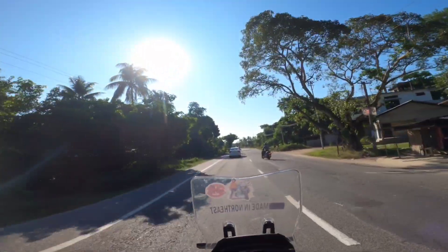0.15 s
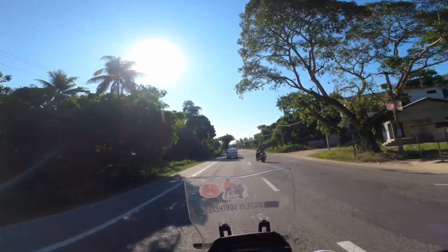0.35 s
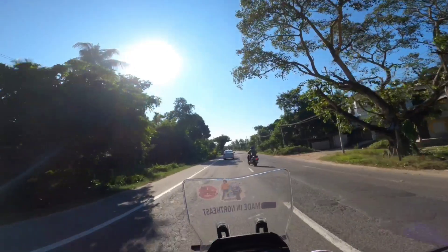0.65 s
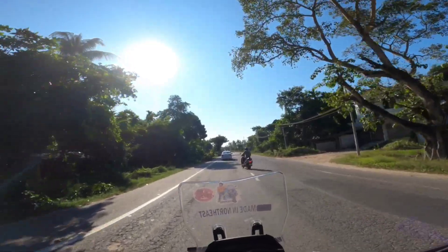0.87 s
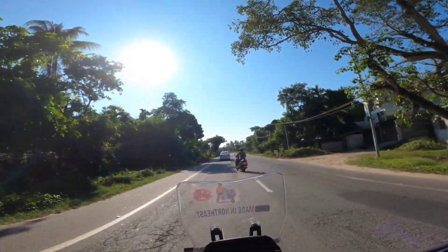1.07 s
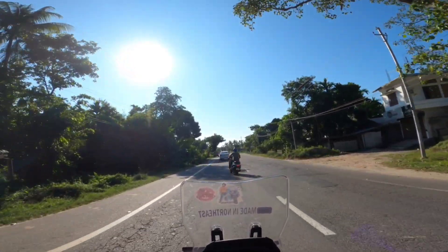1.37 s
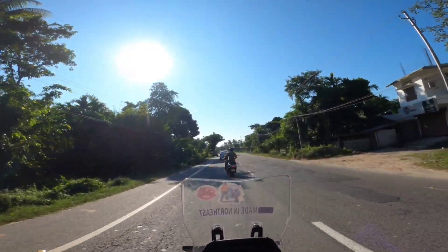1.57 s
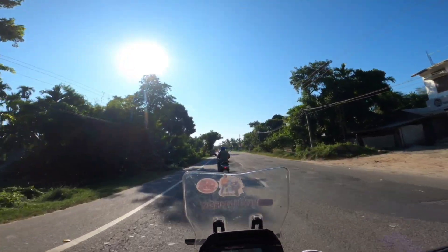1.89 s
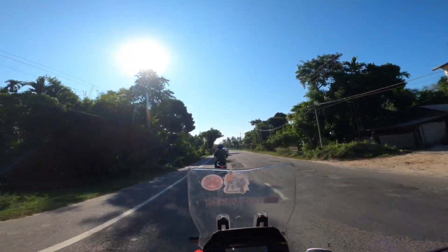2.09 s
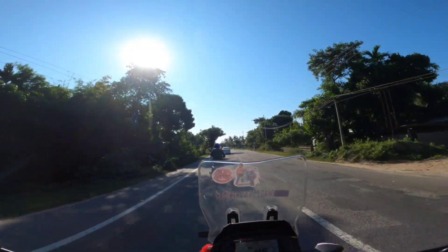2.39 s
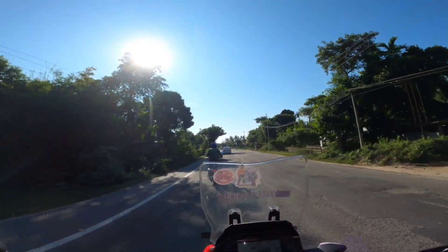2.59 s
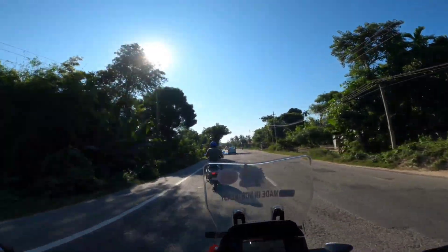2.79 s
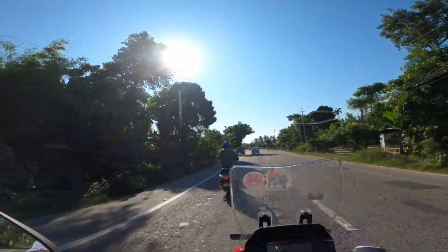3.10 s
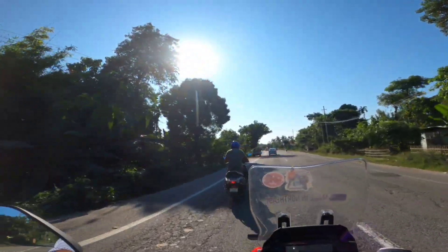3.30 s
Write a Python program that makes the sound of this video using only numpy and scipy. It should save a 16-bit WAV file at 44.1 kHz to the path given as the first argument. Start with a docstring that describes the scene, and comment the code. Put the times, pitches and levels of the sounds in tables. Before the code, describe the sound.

A motorcycle horn starts at about 0.1 seconds and holds one steady, raspy note until 1.9 seconds, with faint, slightly higher echoes from the roadside. Wind rumbles and thumps on the on-board microphone throughout, gusting around 0.7, 0.8 and 3 seconds. A soft engine hum sinks slightly in pitch beneath it. From about 2 seconds a loose fitting ticks faintly, and the wind rush and engine swell from 2.5 seconds.

```python
"""On a tree-lined road, a moving motorcycle sounds its electric disc horn once, for almost two seconds.
An armature strikes once a cycle, giving a harmonic series and a rasp. Trees and walls reflect the horn,
raised in pitch by the Doppler effect. Turbulent wind buffets the on-board microphone, the engine hums
beneath it, and a loose fitting ticks as the ride gets rougher."""
import sys
import numpy as np
from scipy import signal
from scipy.fft import rfft, irfft
from scipy.io import wavfile

SR = 44100
rng = np.random.default_rng(int(sys.argv[2]) if len(sys.argv) > 2 else 0)


def bounce(signal):
    """Save signal as a 16-bit WAV file at the path given by the first command-line argument."""
    frames = np.transpose(np.atleast_2d(signal))
    limited = np.clip(frames, -1, 1)
    pcm = np.round(limited * 32767).astype(np.int16)
    wavfile.write(sys.argv[1], SR, pcm)


N = 152145
T = np.arange(N) / SR
HZ = np.fft.rfftfreq(N, 1 / SR)

# envelope of the wind's hiss, which the faint ticks also follow: time_s, level_db
HISS_LEVEL = [(0, -49), (1.9, -53), (2.25, -54), (2.42, -49), (2.48, -51), (2.7, -50), (3.0, -44.5),
              (3.2, -48.5), (3.45, -47)]


def horn():
    """Periodic impact: an armature striking once a cycle excites harmonics and a pulsed rasp."""
    # fundamental: time_s, pitch_hz
    pitch = [(.085, 445.3), (.25, 444.8), (.55, 444.4), (.66, 443.8), (1.2, 443.55), (1.88, 443.2)]
    # envelope of the tone: time_s, level_db
    level = [(.09, -23), (.35, -26.5), (.65, -23.5), (1.25, -22.5), (1.6, -25), (1.89, -25.5)]
    # harmonic series before shaping: harmonic_number, relative_db
    partials = [(1, 0), (2, -17), (3, -24), (4, -29), (5, -31), (6, -4), (7, -4), (8, -4), (9, -22),
                (10, -18), (11, -17), (12, -35), (13, -34), (14, -31), (15, -28), (16, -39), (17, -33),
                (18, -25), (19, -23), (20, -28), (21, -28), (22, -22), (23, -25), (24, -34), (25, -35),
                (26, -28), (27, -34), (28, -29), (29, -35), (30, -35), (31, -34), (32, -30), (33, -33),
                (34, -29), (35, -38)]
    # boost and cut near 6.4 kHz, brightest late in the blast: time_s, gain_db
    shine = [(0, -2), (.4, 3), (.7, -5.5), (1.35, -8), (1.41, 5), (1.9, 3)]
    # spectrum of the armature's rasp: frequency_hz, relative_db
    rasp_spectrum = [(1800, -26), (2600, -5), (3800, -2), (4700, 15), (5600, 3), (7400, 1), (8400, 19),
                     (9200, -3), (10200, 5), (11000, 3.5), (12000, -3), (13100, -7), (14000, -7),
                     (15500, -18)]
    on_s, off_s, attack_s, release_s, sag_hz_per_s = .082, 1.8925, .004, .004, 1400
    flutter_hz, flutter_rad, flutter_depth = 65, .019, .085
    jitter_rad, shimmer_hz = .016, 257
    hollow_db, rasp_db, strike_decay_cycles = -6, -45.5, .25

    since_off = np.maximum(T - off_s, 0)
    gate = np.clip((T - on_s) / attack_s, 0, 1) * np.exp(-since_off / release_s)
    pitch_hz = curve(pitch) - sag_hz_per_s * np.minimum(since_off, .05)
    flutter = np.sin(2 * np.pi * flutter_hz * T + .9 * drift(8.6))
    phase = 2 * np.pi * np.cumsum(pitch_hz) / SR + flutter_rad * flutter + jitter_rad * drift(160)
    tone = np.zeros(N)
    for k, db in partials:
        if k in (2, 3, 4):  # below the diaphragm's resonance
            db = db + hollow_db
        elif k in (14, 15):
            db = db + curve(shine)
        # higher partials are less steady: a slow wander in level, a fast shimmer in level and phase
        khz = k * pitch[0][1] / 1000
        wander_db = glide(9.04) * min(.6 + .25 * khz, 2.6)
        shimmer = .033 + .035 * max(khz - 1.64, 0)
        angle = k * phase + rng.normal(0, .11 * k) + shimmer * glide(shimmer_hz)
        tone += amp(db + wander_db) * (1 + shimmer * glide(shimmer_hz)) * np.cos(angle)
    tone *= np.sqrt(2) * amp(curve(level)) * (1 + flutter_depth * flutter)
    strikes = np.exp(-(phase / (2 * np.pi) % 1) / strike_decay_cycles)
    rasp = amp(rasp_db) * unit(colour(strikes * rng.standard_normal(N), rasp_spectrum))
    return gate * (tone + rasp)


def roadside_echoes(blast, reflectors=90):
    """Doppler effect: echo paths to trunks and walls ahead shorten, which raises their pitch."""
    # response of the horn's forward beam: frequency_hz, gain_db
    beam_spectrum = [(440, -9), (2200, -16), (2660, -20), (3100, -3), (3550, -13.5), (4000, -9),
                     (4900, -18), (6500, -19), (9000, -10.5), (15000, -18)]
    bike_m_per_s, sound_m_per_s = 10, 343
    road_m, verge_m, depth_m, echo_db = 46, 7, 34, -9.5
    beam = colour(blast, beam_spectrum)
    echoes = np.zeros(N)
    for i, (along, aside, polarity) in enumerate(rng.random((reflectors, 3))):
        ahead_m = road_m * (i + along) / reflectors - bike_m_per_s * T
        distance_m = np.hypot(ahead_m, verge_m + depth_m * aside ** 2)
        directivity = .6 + .4 * ahead_m / distance_m
        spreading = (verge_m / distance_m) ** 1.7
        delayed = np.interp(T - 2 * distance_m / sound_m_per_s, T, beam, left=0)
        echoes += np.sign(polarity - .5) * directivity * spreading * delayed
    return amp(echo_db) * echoes


def wind_buffeting():
    """Turbulent pressure: eddies thump on the microphone, the strongest flattened by soft saturation."""
    # envelopes of the deep buffeting and the thumping above it: time_s, relative_db
    buffet_level = [(0, -15), (.15, -21), (.5, -19), (.7, -14), (1.0, -17), (1.25, -16), (1.6, -21),
                    (2.0, -22), (2.35, -18), (2.6, -17), (2.85, -21), (3.0, -14), (3.2, -22), (3.45, -20)]
    thump_level = [(.02, -24), (.13, -35), (.4, -23.5), (.58, -28), (.68, -17.5), (.79, -28), (.845, -12.5),
                   (1.05, -28), (1.15, -18), (1.3, -25), (1.7, -28.5), (2.1, -30), (2.5, -27), (2.85, -31),
                   (2.96, -17.5), (3.15, -31), (3.45, -26)]
    # gusts that slap the microphone: centre_s, half_width_s, level_db
    gusts = [(0.687, 0.029, -20.5), (0.838, 0.026, -23), (1.17, .02, -28), (2.046, 0.0097, -28.5),
             (2.558, 0.02, -23), (2.967, .025, -29)]
    # spectra of the three noises: frequency_hz, relative_db
    buffet_spectrum = [(3, -8), (10, 3), (20, 2), (32, 0), (42, -4), (55, -14), (100, -40), (400, -120)]
    thump_spectrum = [(25, -2), (45, -4), (62, -2), (82, -2.5), (105, -10.5), (160, -23), (600, -120)]
    gust_spectrum = [(30, -16), (60, 8), (100, -4.5), (200, -8), (500, -11.5), (1000, -31), (2000, -32),
                     (5000, -67)]
    ceiling = .55
    buffet = unit(np.tanh(noise(buffet_spectrum) / 2)) * amp(curve(buffet_level) + 4)
    thump = unit(np.tanh(noise(thump_spectrum) / 2)) * amp(curve(thump_level) + .7)
    gust_envelope = sum(amp(db) * np.exp(-((T - at) / width) ** 2) for at, width, db in gusts)
    slaps = noise(gust_spectrum) * gust_envelope
    return ceiling * np.tanh((buffet + thump + slaps) / ceiling)


def wind_rush():
    """Amplitude modulation: the same eddies shake a low flapping, a rush and a hiss together."""
    # envelopes of the flapping and of the rush of air and tyres: time_s, relative_db
    flap_level = [(0.0, -32), (0.08, -23.5), (0.17, -35), (0.23, -27.5), (0.96, -31), (1.05, -41),
                  (1.13, -25.5), (1.37, -35.5), (1.41, -20), (1.44, -31.5), (2.11, -34.5), (2.94, -27),
                  (3.36, -29.5), (3.45, -28.5)]
    rush_level = [(0, -32.5), (.15, -34), (.7, -36), (1.1, -34), (1.6, -37.5), (2.0, -37.5), (2.3, -36),
                  (2.6, -32.5), (2.98, -29.5), (3.22, -31), (3.45, -30.5)]
    # spectra of the three bands: frequency_hz, relative_db
    flap_spectrum = [(50, -18), (100, 3), (130, 0), (190, -2), (260, -2), (330, -6.5), (420, -15.5),
                     (700, -23.5), (2000, -68)]
    rush_spectrum = [(200, -5.5), (390, -1), (490, 6), (640, 1), (850, 0.5), (1060, 0), (1250, -8),
                     (1550, -7.5), (2000, -19.5), (3000, -30.5), (6000, -39)]
    hiss_spectrum = [(1000, -1), (2200, 3.5), (2900, 8.5), (3600, -2), (4600, 0), (6500, -4.5), (8800, -7),
                     (11000, -16), (15500, -24)]
    eddies = drift(29)
    flap = noise(flap_spectrum) * amp(curve(flap_level) + 2 + 2 * eddies)
    rush = noise(rush_spectrum) * amp(curve(rush_level) + 2.5 + 1.26 * eddies)
    hiss = noise(hiss_spectrum) * amp(curve(HISS_LEVEL) + 1.1 * eddies + 1.34 * drift(90))
    return flap + rush + hiss


def engine():
    """Periodic vibration: engine and drive give three wavering tones, each with a weak octave."""
    # a hum, a whine that sinks as the bike slows, an intermittent lower hum: time_s, pitch_hz, level_db
    hum = [(0, 300, -44), (1.0, 297, -37), (1.45, 291, -40.5), (1.75, 276, -34), (2.1, 272, -36),
           (2.4, 270, -39.5), (2.65, 273, -30.5), (2.9, 274, -33), (3.2, 268, -44), (3.45, 268, -40)]
    whine = [(0, 406, -42), (.4, 381, -37), (.72, 379, -37.5), (1.0, 358, -54), (1.5, 340, -70)]
    low_hum = [(0, 292, -51), (0.852, 277, -42.5), (1.201, 261, -36), (1.7, 244, -43), (2.4, 250, -43),
               (2.62, 254, -33.5), (2.9, 258, -39), (3.1, 240, -32), (3.45, 236, -55)]
    waver_hz, waver_db, octave_db = 1.23, 1.1, -16
    tones = np.zeros(N)
    for track in (hum, whine, low_hum):
        phase = 2 * np.pi * np.cumsum(curve(track) + waver_hz * drift(10.7)) / SR
        envelope = amp(curve(track, column=2) + waver_db * drift(14))
        tones += envelope * (np.sin(phase) + amp(octave_db) * np.sin(2 * phase))
    return np.sqrt(2) * tones


def loose_fitting():
    """Modal resonance: short bursts of chatter ring a few high modes of a loose fitting."""
    # distinct ticks: start_s, relative_db
    ticks = [(2.0797, -48), (2.168, -49), (2.4166, -43), (2.4294, -46), (2.6708, -42), (2.8047, -41),
             (2.822, -43), (2.8749, -43), (3.0584, -49), (3.0704, -41), (3.1014, -37), (3.1536, -43),
             (3.235, -39), (3.3099, -36.5)]
    # resonances of the fitting: frequency_hz, bandwidth_hz, relative_db
    modes = [(4500, 1000, 2), (7860, 500, -1), (8500, 370, 4), (12100, 4300, -21)]
    decay_s, faint_per_s, gain_db = .004, 29, -2
    distinct = sum(amp(db) * (T >= at) * np.exp(-abs(T - at) / decay_s) for at, db in ticks)
    # faint random ticks in between grow louder with the wind
    impulses = (rng.random(N) < faint_per_s / SR) * rng.random(N) * amp(curve(HISS_LEVEL) + 5)
    faint = signal.lfilter([1], [1, -np.exp(-1 / (decay_s * SR))], impulses)
    chatter = (distinct + faint) * rng.standard_normal(N)
    response = sum(amp(db) / (1 + 2j * (HZ - hz) / width) for hz, width, db in modes)
    response /= np.sqrt(np.mean(abs(response) ** 2))
    return amp(gain_db) * irfft(rfft(chatter) * response, N)


def amp(db):
    """Amplitude ratio for a level in decibels."""
    return 10 ** (np.asarray(db) / 20)


def unit(x):
    """Normalisation to rms 1."""
    return x / np.sqrt(np.mean(x ** 2) + 1e-20)


def curve(rows, column=1):
    """Linear interpolation of one column of a time table at every sample."""
    rows = np.array(rows)
    return np.interp(T, rows[:, 0], rows[:, column])


def colour(x, spectrum):
    """Zero-phase filtering by a table of frequency_hz, gain_db."""
    hz, db = np.transpose(spectrum)
    return irfft(rfft(x) * amp(np.interp(np.log(HZ + 1), np.log(hz + 1), db)), N)


def noise(spectrum):
    """Spectrally shaped Gaussian noise of rms 1."""
    return unit(colour(rng.standard_normal(N), spectrum))


def drift(rate_hz):
    """Low-pass random motion of rms 1, up to about the given rate."""
    lowpass = (HZ > 0) / (1 + (HZ / rate_hz) ** 4)
    return unit(irfft(rfft(rng.standard_normal(N)) * lowpass, N))


def glide(rate_hz, size=4000):
    """Linear interpolation between random values that arrive at the given rate."""
    return np.interp(T * rate_hz, np.arange(size), rng.standard_normal(size))


def scene():
    """Superposition: all sources add at the on-board microphone, the same in both channels."""
    blast = horn()
    mix = blast + roadside_echoes(blast) + wind_buffeting() + wind_rush() + engine() + loose_fitting()
    return np.array([mix, mix])


def record(dry):
    """Band limiting: a steep low-pass filter removes the highest treble."""
    cutoff_hz = 15550
    lowpass = signal.firwin(1023, cutoff_hz, window=("kaiser", 9), fs=SR)
    return signal.oaconvolve(dry, lowpass[None], "same")


dry = scene()
out = record(dry)
bounce(out)
```